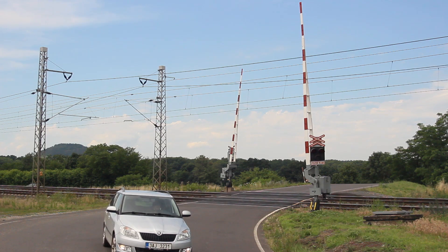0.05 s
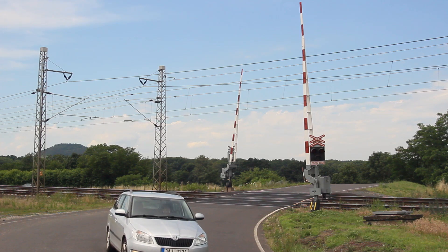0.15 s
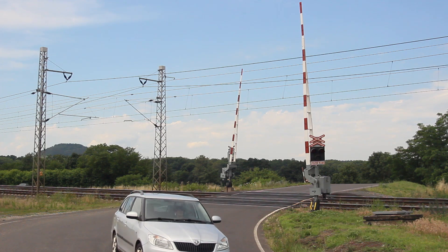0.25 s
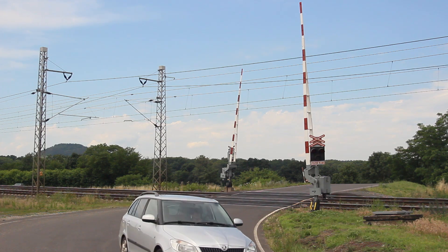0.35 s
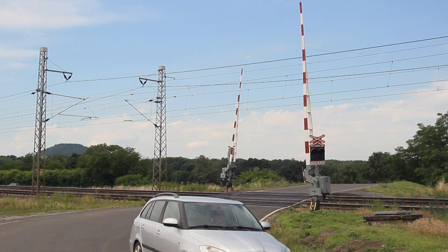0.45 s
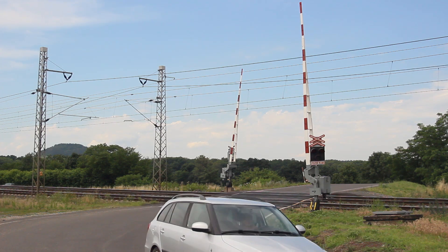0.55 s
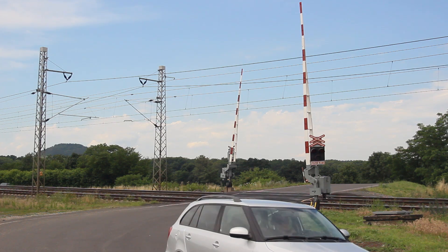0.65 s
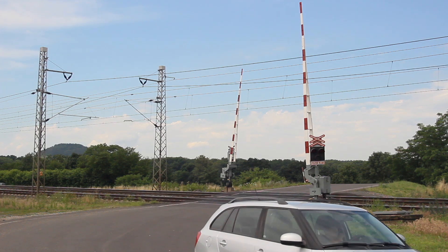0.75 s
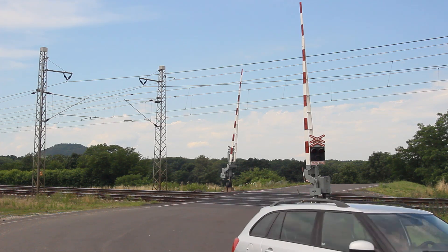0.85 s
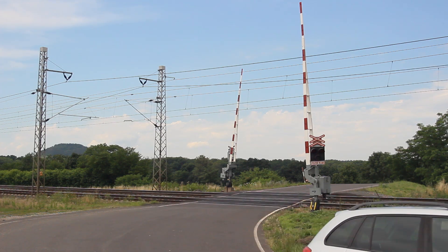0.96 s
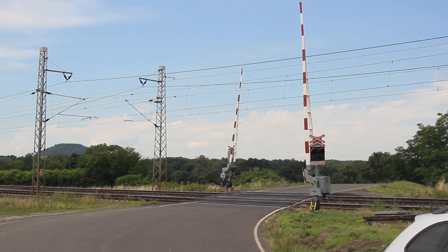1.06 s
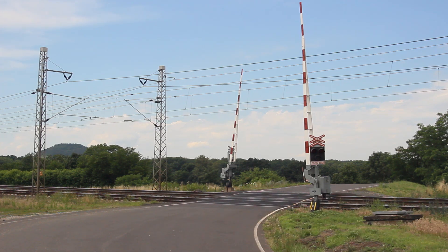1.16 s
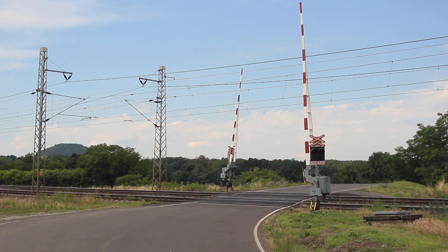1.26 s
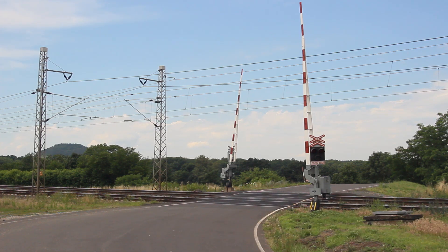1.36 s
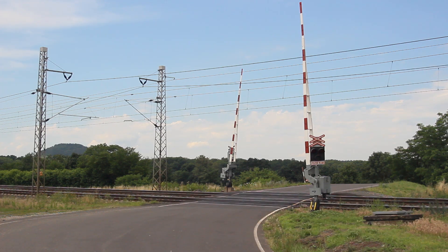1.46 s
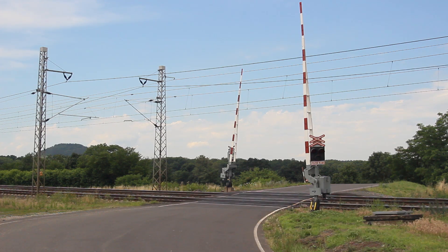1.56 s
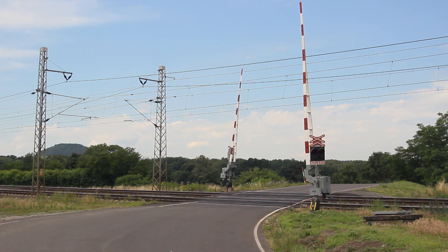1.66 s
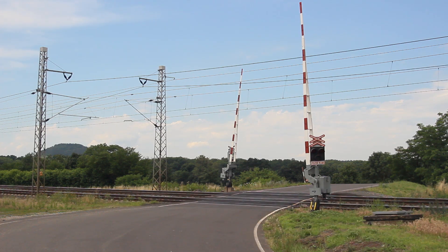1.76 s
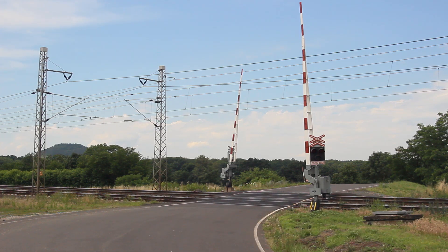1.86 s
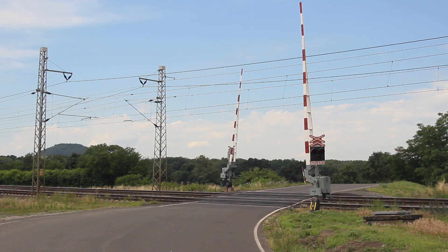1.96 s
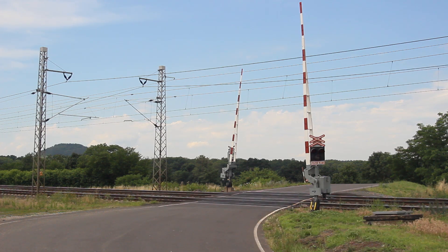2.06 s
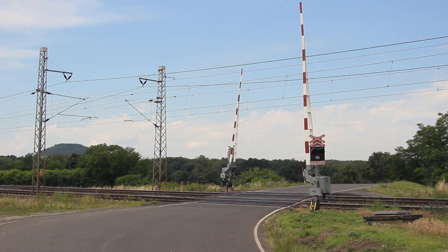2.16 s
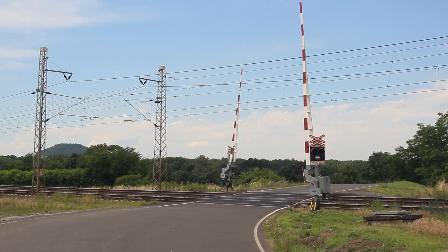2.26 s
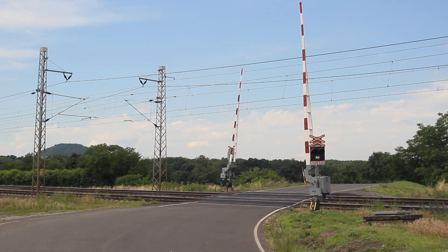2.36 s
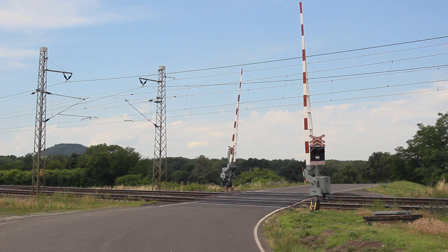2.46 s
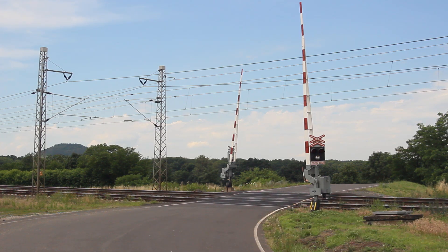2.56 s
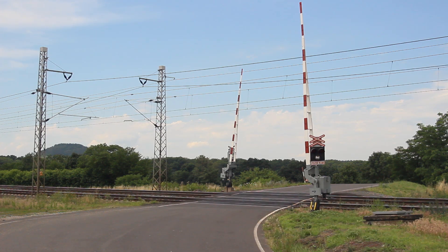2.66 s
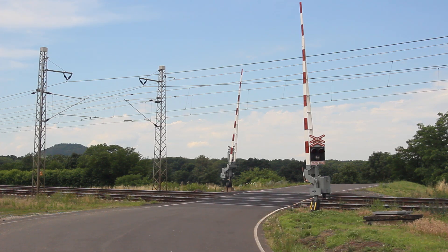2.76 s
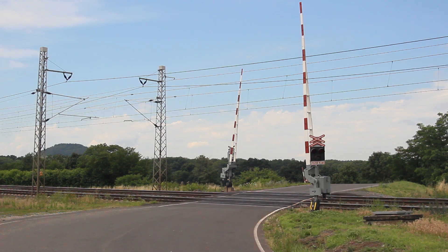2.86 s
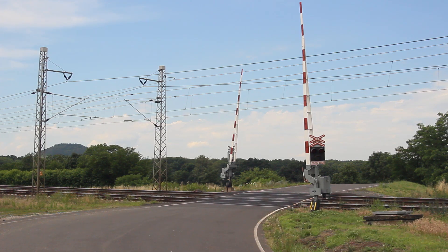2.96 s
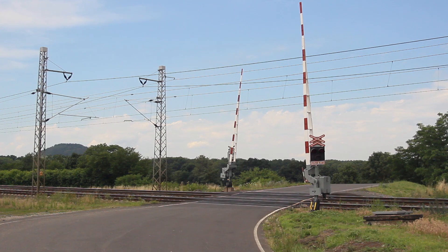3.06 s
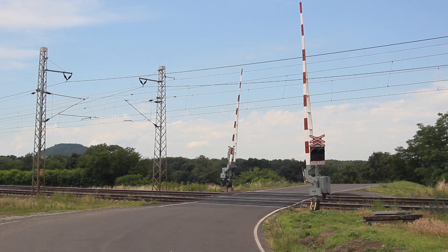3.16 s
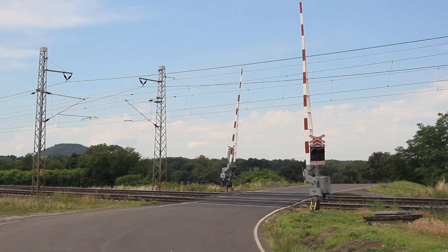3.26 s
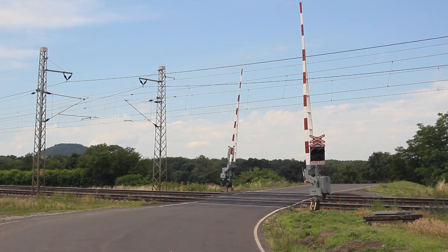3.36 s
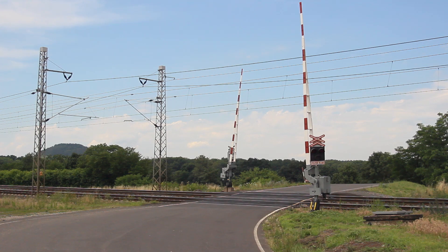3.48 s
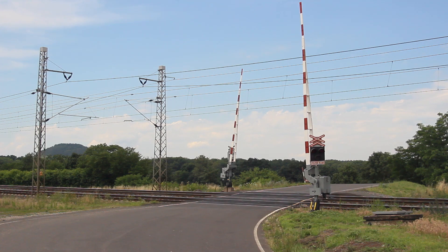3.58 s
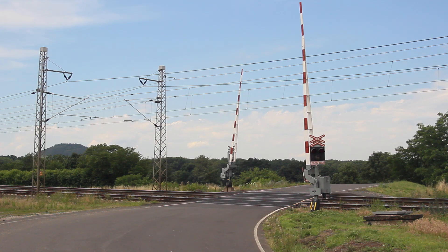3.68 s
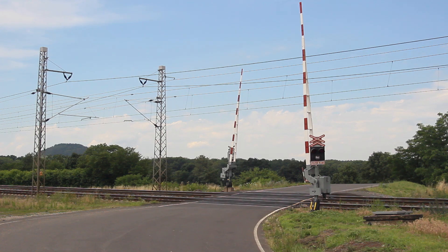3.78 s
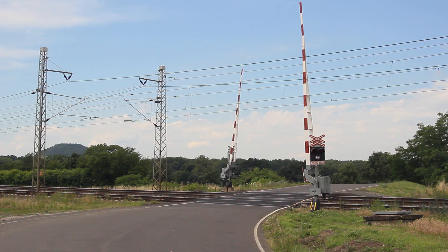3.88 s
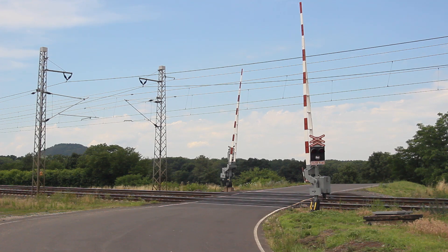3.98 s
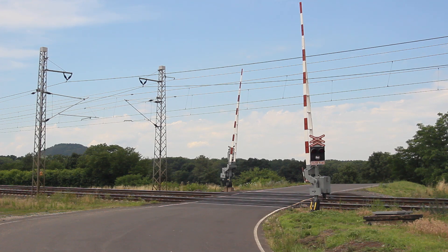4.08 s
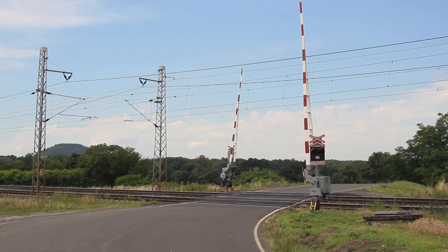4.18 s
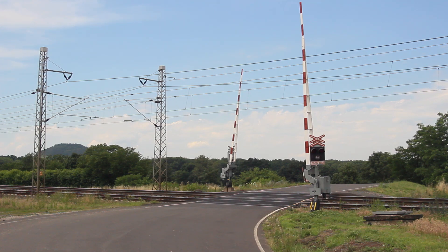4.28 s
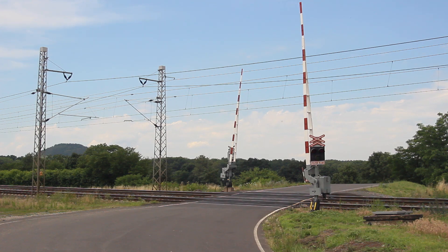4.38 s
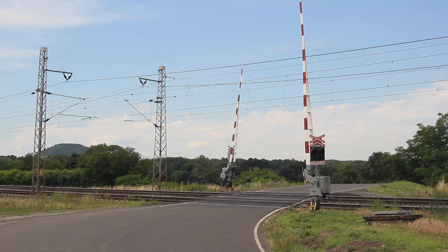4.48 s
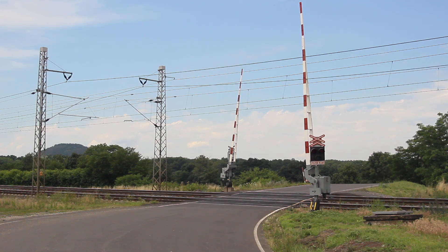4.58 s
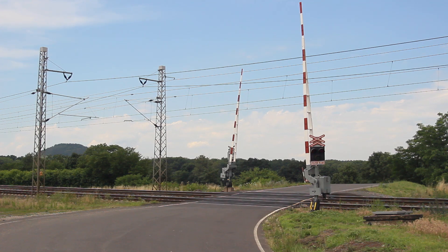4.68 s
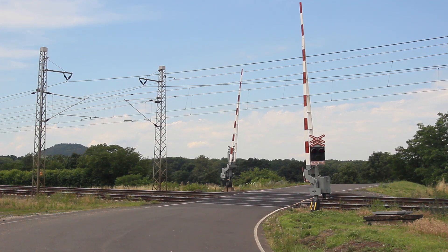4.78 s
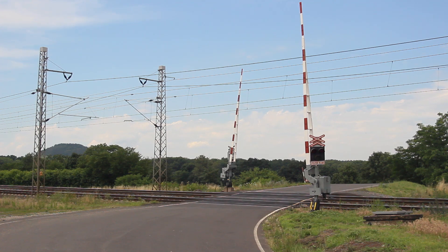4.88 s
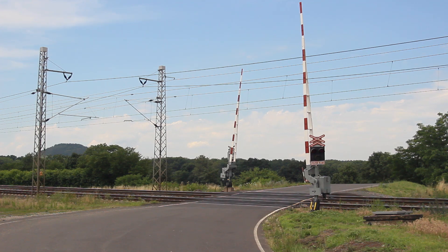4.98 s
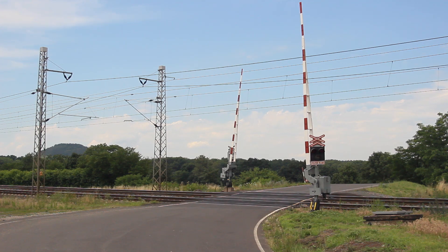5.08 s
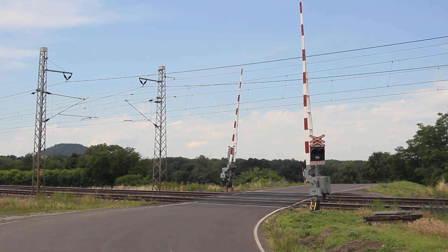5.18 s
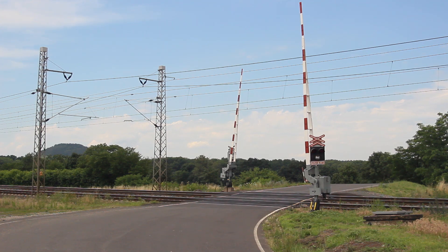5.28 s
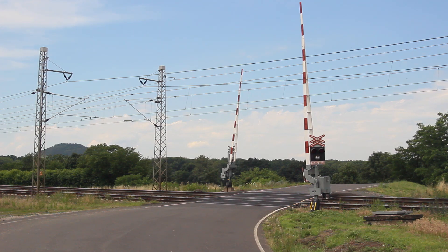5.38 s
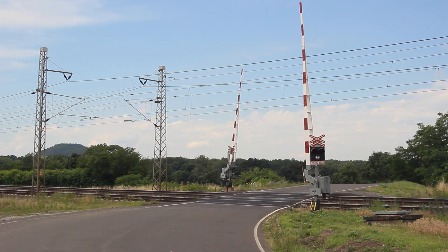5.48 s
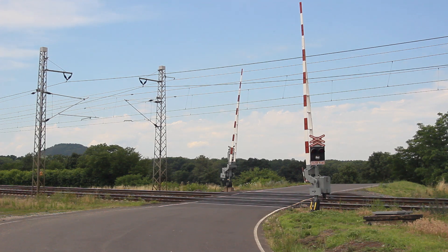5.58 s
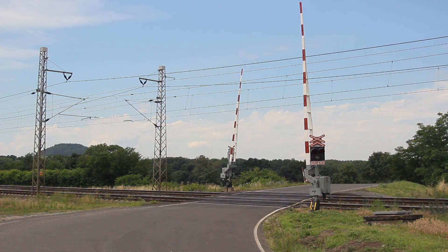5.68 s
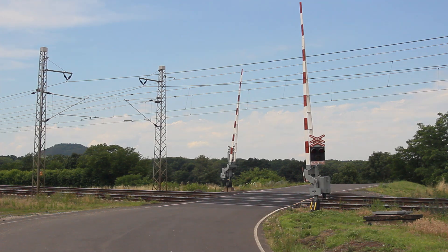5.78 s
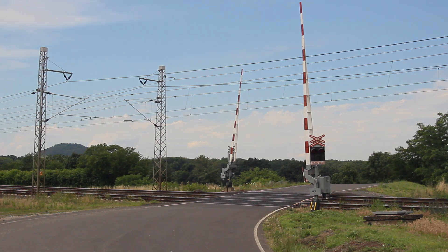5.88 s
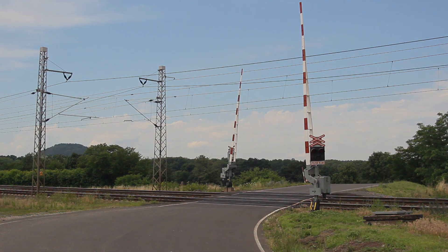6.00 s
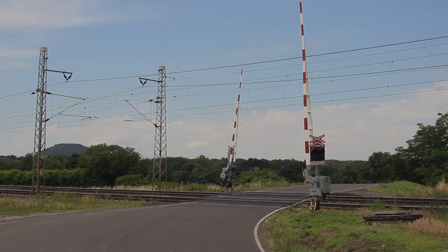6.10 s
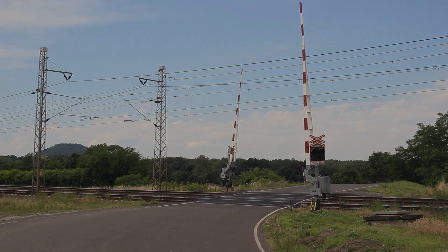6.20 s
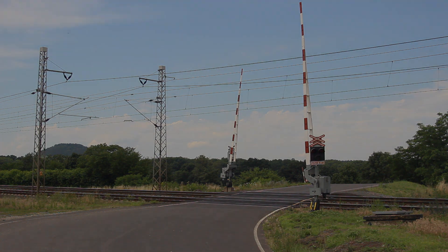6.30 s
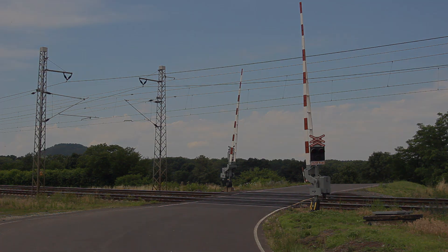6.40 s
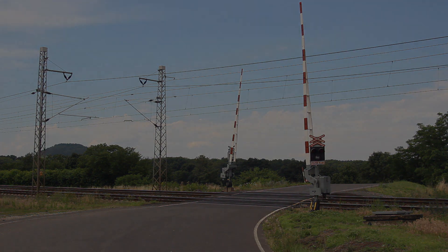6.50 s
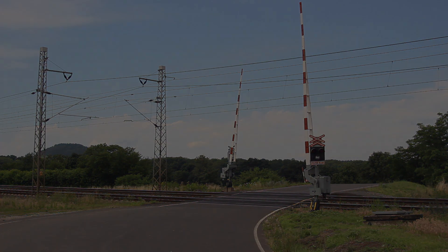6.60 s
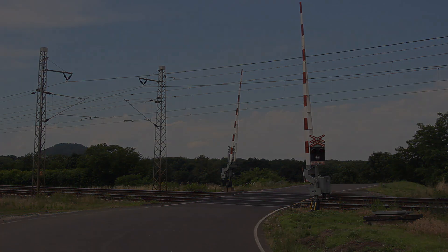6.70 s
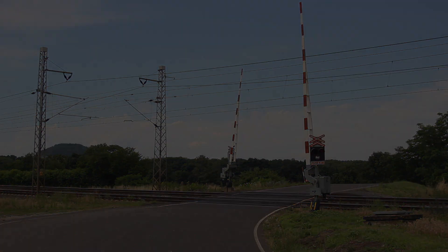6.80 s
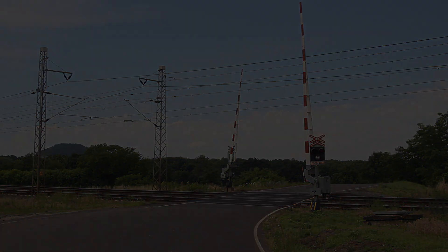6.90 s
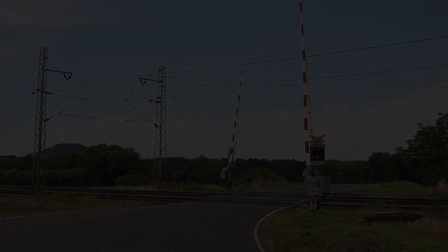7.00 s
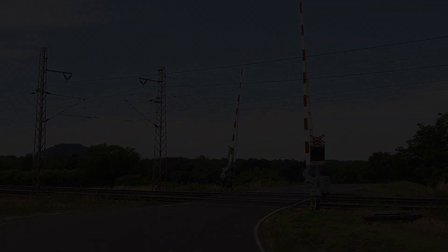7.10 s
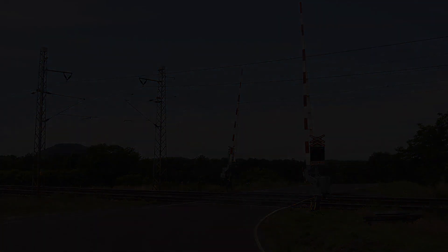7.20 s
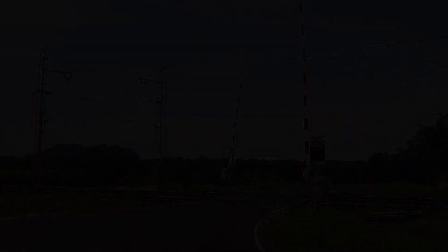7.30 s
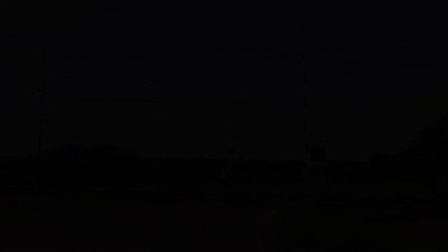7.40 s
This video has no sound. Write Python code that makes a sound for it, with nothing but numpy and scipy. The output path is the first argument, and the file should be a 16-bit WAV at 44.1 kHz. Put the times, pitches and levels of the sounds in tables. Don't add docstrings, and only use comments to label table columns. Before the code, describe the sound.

A small car is close to the roadside microphone from the first instant: steady broad tyre roar, mid-low body rumble and a modest four-cylinder hum. Near 1 s a brighter airy hiss from its front swells briefly, then turns into the sharper hiss of rear tyres and exhaust. A soft, dull tyre thump lands at 1.6 s. From about 2 s the noise falls away while the engine pitch rises under load, eases at 3.4 s, drops for the next gear and pulls on, faint by 4.5 s. Thin lark chips appear from 2.6 s, growing into fast whistles, trills and rasps, clearest at 5 to 5.5 s, then sparser. A very faint, very high cricket scrape and soft air hiss lie beneath throughout. From 6 s everything fades steadily, with a barely audible wind puff at 7 s and last chirps near 7.3 s.

```python
import sys
import numpy as np
from scipy import signal
from scipy.fft import rfft, irfft, next_fast_len
from scipy.io import wavfile
from scipy.ndimage import uniform_filter1d, map_coordinates

SR = 44100
rng = np.random.default_rng(int(sys.argv[2]) if len(sys.argv) > 2 else 0)


def pcm_store(signal):
    levels = np.round(np.clip(np.atleast_2d(signal), -1, 1) * 32767)
    wavfile.write(sys.argv[1], SR, levels.astype(np.int16).T)


def ratio_of_db(decibels):
    return 10 ** (np.asarray(decibels, float) / 20)


N = 328523
TIME_S = np.arange(N) / SR

# frequency [Hz], density [dB per Hz].
AIR_SPECTRUM = [(12, -41), (20, -6.5), (220, 6), (599, -5.5), (1050, -7), (2480, -11), (3560, -11),
                (4210, -12), (4710, -18), (5560, -11.5), (9990, -14.5), (14000, -10.5), (15600, -12)]
# frequency [Hz], density [dB per Hz].
CAPSULE_SPECTRUM = [(12, -37), (20, -5), (770, -9.5), (1240, -12), (1420, -44), (1780, -10.5), (3980, -9),
                    (4710, -8), (5410, -10.5), (15600, -8.5)]

# part of the syllable [0-1], pitch ratio, level [dB].
FALL_SHAPE = [(0, .97, -12), (.15, 1.0, -1), (.4, .94, 0), (.55, .86, -6), (.9, .7, -10), (1, .68, -25)]
RISE_SHAPE = [(0, .84, -1), (.2, 1.1, -1.5), (.4, 1.09, 6.5), (.55, 1.17, -6), (.75, 1.08, -4),
              (1, 0.73, -18)]
HOOK_SHAPE = [(0, 1.01, -2), (.3, .97, 0), (.62, .985, -1), (.82, 1.15, -2), (1, 1.03, -4)]
ARCH_SHAPE = [(0, .86, -7), (.15, .98, -0.5), (.5, 1.02, -5.5), (.75, .99, 2.5), (.9, .88, 3),
              (1, 0.71, -20)]
BUZZ_SHAPE = [(0, .965, -13), (.4, 1.0, 0), (.7, 1.05, -6), (1, .975, -8)]
WARBLE_SHAPE = [(0, 1.04, -1), (.5, .96, -2), (.8, 1.0, -5), (1, 1.04, -4)]
# start [s], end [s], start pitch [Hz], end pitch [Hz], level [dB].
FALLS = [
    (5.9, 5.94, 3900, 3500, -44),
]
EASY_FALLS = [
    (4.594, 4.616, 2900, 2900, -49),
    (4.628, 4.65, 2950, 2900, -48),
    (4.662, 4.684, 2950, 2900, -49),
    (4.696, 4.718, 2900, 2900, -50),
    (5.174, 5.235, 3400, 3170, -39),
    (6.78, 6.83, 2920, 2900, -49),
]
SLOW_FALLS = [
    (4.107, 4.207, 4100, 4500, -43.5),
    (4.208, 4.378, 4370, 4480, -39),
]
RISES = [
    (3.382, 3.41, 3800, 3780, -47),
    (5.255, 5.269, 3540, 3600, -35.5),
    (5.371, 5.381, 4280, 4300, -37),
    (5.381, 5.41, 4800, 5130, -33.5),
    (5.411, 5.5, 5170, 5160, -32.5),
    (5.381, 5.5, 4330, 4530, -40),
    (5.545, 5.56, 5299, 5330, -45),
]
EASY_RISES = [
    (4.977, 5.035, 3650, 4320, -39),
    (5.107, 5.16, 3640, 3800, -38.5),
]
QUICK_RISES = [
    (4.843, 4.925, 3880, 3490, -49),
]
HOOKS = [
    (3.74, 3.965, 5250, 4470, -47.5),
]
ARCHES = [
    (4.395, 4.47, 3450, 3620, -49),
    (5.965, 6.04, 3380, 3620, -43.5),
    (6.15, 6.217, 3477, 3580, -42),
]
SLOW_ARCHES = [
    (6.955, 7.018, 3640, 5150, -44),
    (7.019, 7.155, 5340, 5450, -43.5),
]
BUZZES = [
    (3.54, 3.6, 4960, 4950, -49),
    (5.27, 5.335, 5400, 5513, -44),
    (5.275, 5.33, 4800, 4930, -45),
]
BURRS = [
    (4.22, 4.29, 3480, 3590, -50),
    (5.34, 5.365, 3469, 3520, -43),
    (5.39, 5.49, 4480, 4430, -38.5),
    (5.7, 5.8, 2830, 2580, -45),
]
WARBLES = [
    (5.022, 5.063, 4350, 3870, -32),
    (5.066, 5.092, 4180, 4000, -37),
    (5.15, 5.205, 4120, 3730, -30.5),
    (5.206, 5.235, 3920, 3770, -36),
    (5.268, 5.312, 3840, 3370, -30),
    (5.315, 5.343, 3480, 3440, -40),
]
SLOW_WARBLES = [
    (5.697, 5.825, 3390, 3060, -40.5),
]

# start [s], pitch [Hz], level [dB].
UP_CHIPS = [(2.81, 4150, -43), (3.3, 5600, -48), (3.325, 5700, -44), (4.499, 3900, -44.5),
            (5.001, 5400, -50), (5.024, 5600, -50), (2.583, 5240, -41), (3.633, 4730, -49),
            (3.663, 5200, -47), (5.052, 5600, -49), (5.094, 4700, -45), (5.237, 3920, -50),
            (5.48, 3560, -49), (5.562, 3980, -49), (5.594, 2460, -43), (6.077, 4620, -41.5),
            (6.175, 5536, -49), (6.261, 5642, -51), (7.208, 5400, -47), (7.267, 5200, -44)]
DOWN_CHIPS = [(4.57, 3300, -51), (4.096, 3600, -53), (3.6, 4100, -48), (3.608, 3800, -49),
              (3.619, 3800, -55), (3.641, 4150, -51), (3.65, 4250, -53), (3.66, 3930, -49),
              (3.681, 3900, -50), (5.622, 4500, -49), (5.665, 5300, -51), (3.445, 3400, -57),
              (3.409, 5000, -45), (3.418, 4670, -47), (3.425, 4200, -43), (3.432, 3910, -45),
              (3.483, 4820, -45), (3.497, 4720, -43), (3.512, 4400, -44), (5.407, 3080, -48),
              (5.42, 2910, -44), (5.434, 2680, -56), (5.521, 2840, -46), (6.108, 4000, -48.5),
              (6.318, 3370, -43.5), (6.494, 2600, -48), (6.757, 2500, -49), (6.854, 2800, -51),
              (6.892, 2500, -49), (7.283, 4800, -52)]
PEEPS = [(3.8, 3350, -51), (3.542, 3350, -54), (3.527, 3930, -43), (4.7, 5140, -55), (5.516, 6000, -43),
         (5.518, 5000, -40), (5.548, 4630, -45), (5.689, 4470, -46), (6.338, 2550, -51), (6.033, 2500, -50),
         (6.057, 2500, -51), (5.932, 2800, -49), (6.086, 3700, -47), (6.775, 3900, -48), (6.875, 2900, -50)]
# start [s], length [s], top pitch [Hz], drop at both ends [0-1], level [dB].
ARCS = [
    (3.666, .026, 5800, 0.07, -49),
    (5.107, .022, 4830, .055, -48),
    (5.492, 0.041, 3960, 0.04, -44),
    (6.261, 0.038, 4927, 0.09, -44.5),
    (6.835, 0.019, 3860, 0.26, -47),
    (7.291, 0.024, 5526, .24, -43),
    (7.316, .026, 4420, .2, -43),
    (7.343, .031, 3485, 0.17, -49),
    (7.347, 0.033, 4580, 0.1, -45),
]
# start [s], length [s], start pitch [Hz], end pitch [Hz], level [dB].
GLIDES = [(2.591, 0.055, 5530, 3880, -44), (2.845, .045, 3770, 3770, -52), (2.885, 0.13, 3780, 3850, -46),
          (4.519, 0.013, 5300, 5000, -47), (5.247, 0.0063, 3200, 4900, -42),
          (4.849, 0.027, 5030, 4700, -45), (3.458, 0.022, 5450, 4820, -38.5),
          (2.637, 0.047, 5100, 4500, -52), (3.538, 0.062, 5360, 5470, -46.5), (4.59, .03, 5040, 4840, -56),
          (4.613, .04, 3550, 3960, -51), (5.325, 0.077, 4970, 3870, -50), (5.53, .008, 2972, 4800, -38),
          (5.536, .019, 3700, 2900, -45), (5.59, 0.03, 3140, 3370, -54), (5.612, .027, 2005, 2060, -45.5),
          (5.638, 0.0183, 3760, 5100, -44), (5.735, 0.046, 5200, 3950, -48.5),
          (6.322, .011, 3400, 2100, -50), (6.345, .04, 3400, 4700, -55), (5.697, .012, 4300, 3500, -48.5),
          (5.826, .021, 3100, 2500, -48.5), (6.095, 0.017, 3900, 4700, -41),
          (6.356, 0.04, 3360, 3930, -47.5), (7.146, .024, 5130, 4330, -44)]
# start [s], length [s], top pitch [Hz], plunge [0-1], level [dB].
PLUNGES = [
    (4.472, .02, 5450, 0.14, -45),
    (2.821, .045, 5000, .08, -44),
    (3.745, .072, 3980, 0.22, -48),
    (4.957, .026, 4150, .38, -43),
    (4.513, .04, 5080, .11, -41),
    (6.194, 0.02, 5850, 0.26, -44),
    (6.278, .024, 5750, .42, -47),
    (7.237, .013, 5460, .4, -42),
]
# start [s], length [s], top pitch [Hz], plunge [0-1], level [dB].
SWOOPS = [
    (6.398, .035, 4620, .3, -40.5),
    (2.668, .03, 4450, .08, -43),
]
# start [s], end [s], pulse rate [per s], last throat resonance [Hz], level [dB].
RASPS = [
    (4.703, 4.927, 328, 4430, -46),
    (6.45, 6.698, 314.5, 4300, -46),
]

# start [s], frequency [Hz], level [dB], time to fall 60 dB [s].
KNOCKS = [
    (1.56, 268, -14, .2),
    (7.02, 60, -37, .3),
    (7.04, 104, -35, 0.28),
]

# time [s], level [dB].
CAR = [
    (0, -16),
    (.02, -18.5),
    (1.0, -19.5),
    (1.8, -20),
    (2.26, -27),
    (3.05, -31.5),
    (3.44, -35.5),
    (4.4, -44.5),
    (7.45, -46.5),
]
# time [s], effort [dB].
EFFORT = [(0, -13), (1.15, -8), (2.05, -4), (2.5, -1), (3.05, 0), (3.22, -1), (3.34, -6), (3.45, -12),
          (3.65, -2), (4.3, -6), (4.8, -40)]
# time [s], speed [turns per s].
CRANK = [
    (0, 39.8),
    (1.1, 42.7),
    (2.0, 44.4),
    (3.25, 48.3),
    (3.36, 48.5),
    (3.55, 40.5),
    (4.4, 41),
]
# multiple of crank speed, level [dB].
UPPER_ORDERS = [(4, -6), (6, -2), (8, -3), (10, 0), (11, -10), (12, 0), (13, -14), (14, 0), (16, -4),
                (18, -7)]
# frequency [Hz], width [Hz], level [dB].
PIPE = [(186.4, 75, -10), (257.4, 20.4, -4.5), (361, 23, -10.5), (479.6, 30, -4.5), (563.5, 52, -6.5),
        (611.4, 37, -2.5), (681, 20, -16)]
# time [s], level [dB], width [s].
BOOMS = [
    (.45, -50, 0.19),
    (1.66, -46.5, 0.2),
]
# frequency [Hz], density [dB per Hz].
RUMBLE = [(53, -49), (90, -20), (119, -17), (178, -8.5), (265, 0), (353, -4), (495, 2), (583, 0.5),
          (794, -3), (900, -2), (1170, -13.5), (1980, -120)]
# frequency [Hz], density [dB per Hz].
ROAR = [(400, -39), (650, -7), (760, -14), (1010, 0.5), (1190, -0.5), (1580, -5), (2080, -10.5),
        (2450, -12), (3000, -18.5), (3900, -15.5), (4600, -32), (8000, -61)]
# frequency [Hz], density [dB per Hz].
NOSE_HISS = [(1100, -61), (1800, -5.5), (2450, 2.5), (3000, 3.5), (3500, -4.5), (3880, -2), (4500, -8),
             (5600, -10), (6800, -15.5), (7700, -12), (10800, -21), (12100, -27.5), (13300, -23),
             (14400, -38), (15600, -54)]
# frequency [Hz], density [dB per Hz].
TAIL_HISS = [(1800, -11.5), (3000, -8.5), (4500, 7), (5600, 5.5), (6900, 2), (7700, -1.5), (9000, -4.5),
             (10200, -6), (11200, -10), (12300, -10.5), (15500, -35)]

NOSE_LAG_MS, TAIL_LAG_MS, LEAST_LAG_MS = .185, .165, .1


def rms_one(x):
    return x / np.sqrt(np.mean(x ** 2) + 1e-20)


def in_time(rows):
    s, *columns = np.transpose(rows)
    return [np.interp(TIME_S, s, column) for column in columns]


def drift(rate_hz):
    pole = np.exp(-80 * np.pi * rate_hz / SR)
    noise = rng.standard_normal(N // 40 + 2002)
    slow = signal.lfilter([1], [1, -2 * pole, pole * pole], noise)[2000:]
    return np.interp(np.arange(N) / 40, np.arange(len(slow)), rms_one(slow))


def coloured(spectrum, flicker_db):
    size = next_fast_len(N)
    hz, db = np.transpose(spectrum)
    bins_hz = np.arange(size // 2 + 1) * SR / size
    shape = ratio_of_db(np.interp(np.log(bins_hz + 1), np.log(hz), db))
    noise = irfft(rfft(rng.standard_normal(size)) * shape, size)[:N]
    return rms_one(noise * ratio_of_db(flicker_db * drift(13.6)))


def background(spectrum, level_db, duck):
    car_db, = in_time(CAR)
    excess_db = car_db - car_db.min()
    return ratio_of_db(level_db - duck * excess_db) * coloured(spectrum, flicker_db=.15)


def cricket():
    strokes_per_s, first_s, wing_hz = 88.155, .0082, 13900
    strokes = (TIME_S - first_s + 1) * strokes_per_s
    phase, size_db = rng.uniform(0, 7, 900), rng.normal(0, 3.2, 900)
    k = strokes.astype(int)
    burst = ratio_of_db(size_db[k]) * np.exp(-((strokes % 1 - .25) / .07) ** 2)
    return ratio_of_db(-59) * rms_one(burst * np.sin(2 * np.pi * wing_hz * TIME_S + phase[k]))


def add_tone(out, start_s, hz, gain, edge_s):
    t = np.arange(len(hz)) / SR
    ends = np.clip(np.minimum(t, t[-1] - t) / edge_s, 0, 1)
    i = round(start_s * SR)
    out[i:i + len(hz)] += np.sqrt(2) * gain * ends * np.sin(2 * np.pi * np.cumsum(hz) / SR)


def whistle_notes():
    up_chip, down_chip, peep = (0.0114, 0.934, 1.15), (0.01, 1.126, 0.95), (0.0105, 0.93, 0.87)
    for chips, (length, first, last) in ((UP_CHIPS, up_chip), (DOWN_CHIPS, down_chip), (PEEPS, peep)):
        for s, hz, db in chips:
            yield s, length, first * hz, hz, last * hz, db
    for s, length, hz, drop, db in ARCS:
        yield s, length, hz * (1 - drop), hz, hz * (1 - drop), db
    for s, length, start_hz, end_hz, db in GLIDES:
        mid_hz = start_hz + .6 * (end_hz - start_hz)
        yield s, length, start_hz, mid_hz, end_hz, db


def whistles():
    out = np.zeros(N)
    for s, length, start_hz, mid_hz, end_hz, db in whistle_notes():
        u = np.linspace(-1, 1, round(length * SR))
        bend_hz = (start_hz + end_hz) / 2 - mid_hz
        hz = mid_hz + u * (end_hz - start_hz) / 2 + u ** 2 * bend_hz
        add_tone(out, s, hz, ratio_of_db(db + 4.0 - 1.8 * u ** 2), edge_s=0.0018)
    return out


def trills():
    kinds = [   # phrases, syllable, syllables per s, roughness
        (FALLS, FALL_SHAPE, 118.0, .006), (EASY_FALLS, FALL_SHAPE, 89.0, .006),
        (SLOW_FALLS, FALL_SHAPE, 48.5, .006), (RISES, RISE_SHAPE, 100.0, .015),
        (EASY_RISES, RISE_SHAPE, 86.5, .015), (HOOKS, HOOK_SHAPE, 51.5, .005),
        (ARCHES, ARCH_SHAPE, 67.8, .006), (SLOW_ARCHES, ARCH_SHAPE, 50.0, .006),
        (WARBLES, WARBLE_SHAPE, 78.0, .012), (SLOW_WARBLES, WARBLE_SHAPE, 62.3, .012),
        (BUZZES, BUZZ_SHAPE, 248.0, .008), (QUICK_RISES, RISE_SHAPE, 119.0, .01),
        (BURRS, BUZZ_SHAPE, 100.0, .018)]
    out = np.zeros(N)
    waver, uneven_db = drift(300), drift(50)
    for phrases, shape, per_s, rough in kinds:
        part, ratio, part_db = np.transpose(shape)
        for start, end, start_hz, end_hz, db in phrases:
            t = np.arange(round((end - start) * SR)) / SR
            here = round(start * SR) + np.arange(len(t))
            swell = np.sin(np.pi * (t / t[-1]) ** 0.53)
            carrier_hz = start_hz + (end_hz - start_hz) * t / t[-1]
            carrier_hz = carrier_hz * (1 + rough * waver[here])
            cycle = t * per_s % 1
            hz = uniform_filter1d(carrier_hz * np.interp(cycle, part, ratio), size=25)
            level_db = db + 1.3 * swell + uneven_db[here] + np.interp(cycle, part, part_db)
            add_tone(out, start, hz, uniform_filter1d(ratio_of_db(level_db), size=25), edge_s=0.0028)
    return out


def rasps():
    throat_from_hz, throat_width_hz = 5350, 300
    out, wobble = np.zeros(N), .006 * drift(30) + .014 * drift(300)
    for start, end, per_s, last_hz, db in RASPS:
        part = np.linspace(0, 1, round((end - start) * SR))
        pulse_hz = per_s * (1 + wobble[round(start * SR):][:len(part)])
        throat_hz = last_hz + (throat_from_hz - last_hz) * (1 - part) ** 2.2
        for k in range(11, 20):
            near_db = -8 * ((k * per_s - throat_hz) / throat_width_hz) ** 2
            gain = ratio_of_db(db + 3 + near_db - 7 * (1 - part) ** 8)
            add_tone(out, start, k * pulse_hz, gain, edge_s=.004)
    return out


def plunges():
    out, top_part = np.zeros(N), .55
    for notes, start_ratio in ((PLUNGES, 0.94), (SWOOPS, .8)):
        for s, length, top_hz, drop, db in notes:
            part = np.linspace(0, 1, round(length * SR))
            rise = np.clip(1 - part / top_part, 0, 1)
            fall = np.clip((part - top_part) / (1 - top_part), 0, 1)
            hz = top_hz * (1 - (1 - start_ratio) * rise ** 2 - drop * fall ** 1.5)
            add_tone(out, s, hz, ratio_of_db(db + 2 - 2.6 * fall), edge_s=0.0014)
    return out


def larks():
    song = whistles() + trills() + rasps() + plunges()
    song = song * ratio_of_db(.7 * drift(45))
    size = round(.06 * SR)
    scatter = rng.standard_normal(size) * ratio_of_db(np.linspace(0, -25, size))
    return song + ratio_of_db(-10) * signal.fftconvolve(song, scatter / np.linalg.norm(scatter))[:N]


def knocks():
    out = np.zeros(N)
    for s, hz, db, t60 in KNOCKS:
        since = np.maximum(TIME_S - s, 0)
        swell = 1 - np.exp(-since * hz / 2.3)
        out += ratio_of_db(db - 60 * since / t60) * swell * np.sin(2 * np.pi * hz * since)
    return out


def engine_levels():
    loaded_db = in_time(CAR)[0] + in_time(EFFORT)[0]
    booms = sum(ratio_of_db(db) * np.exp(-((TIME_S - s) / width) ** 2) for s, db, width in BOOMS)
    firing = ratio_of_db(loaded_db - 28) + booms
    return firing, loaded_db - 4


def engine():
    turns, = in_time(CRANK)
    firing, upper_db = engine_levels()
    angle = 2 * np.pi * np.cumsum(turns) / SR
    muffling = np.clip((TIME_S - 3.2) * 5, 0, 1)
    upper = 0
    for k, db in UPPER_ORDERS:
        pipe = sum(ratio_of_db(peak_db) / (1 + (2 * (k * turns - hz) / width_hz) ** 2)
                   for hz, width_hz, peak_db in PIPE)
        muffled_db = 2.0 * max(k - 6, 0) * muffling
        gain = ratio_of_db(db + 1.7 * drift(2.6) - muffled_db) * pipe
        upper = upper + gain * np.sin(k * angle + rng.uniform(0, 7.1))
    firing_note = firing * ratio_of_db(1.2 * drift(3.0)) * np.sin(2 * angle)
    return np.sqrt(2) * (firing_note + ratio_of_db(upper_db) * upper)


def off_asphalt(x, lag_ms, bounce, size=1):
    arrival = np.arange(N) - lag_ms * SR / 1000
    late = map_coordinates(uniform_filter1d(x, size), [arrival], order=3, mode="nearest")
    return (x + bounce * late) / np.sqrt(1 + bounce ** 2)


def echo_lags():
    nose_ms = np.maximum(NOSE_LAG_MS - .024 * TIME_S ** 3, LEAST_LAG_MS)
    away = np.maximum(TIME_S - 1.5, 0) / .7
    return nose_ms, LEAST_LAG_MS + (TAIL_LAG_MS - LEAST_LAG_MS) / (1 + away ** 2)


def car_levels():
    nose_hidden_s, tail_shows_s, swing_s = 1.396, 1.03, 0.073
    aimed_s, aimed_width_s = 0.98, 0.14
    (car_db,), (effort_db,) = in_time(CAR), in_time(EFFORT)
    rumble_db = car_db + .5 - 6.5 * np.clip((TIME_S - 0.69) / 2.9, 0, 1)
    aimed_db = 4 * np.exp(-((TIME_S - aimed_s) / aimed_width_s) ** 2)
    facing_db = -30 + 5.5 * np.minimum(TIME_S, aimed_s) + aimed_db
    nose = ratio_of_db(facing_db) / (1 + np.exp((TIME_S - nose_hidden_s) / swing_s))
    nose = nose + ratio_of_db(car_db - 21)
    shown = 1 / (1 + np.exp((tail_shows_s - TIME_S) / swing_s)) + ratio_of_db(-20)
    tail = shown * ratio_of_db(car_db - 8 + 0.26 * np.maximum(effort_db, -6.5))
    return rumble_db, car_db, nose, tail


def car_noise():
    rumble_db, roar_db, nose, tail = car_levels()
    nose_ms, tail_ms = echo_lags()
    front = nose * off_asphalt(coloured(NOSE_HISS, flicker_db=.6), nose_ms, bounce=.55)
    tail_bounce = .7 * ((tail_ms - LEAST_LAG_MS) / (TAIL_LAG_MS - LEAST_LAG_MS)) ** .6
    rear = tail * off_asphalt(coloured(TAIL_HISS, flicker_db=.6), tail_ms, tail_bounce, size=3)
    opened_db = np.interp(TIME_S, (1.6, 2.3), (-7, 5.5))
    top = signal.sosfiltfilt(signal.butter(2, 7500, "high", fs=SR, output="sos"), rear)
    rear = rear + (ratio_of_db(opened_db) - 1) * top
    floorless = signal.butter(2, 95, "high", fs=SR, output="sos")
    rumble = ratio_of_db(rumble_db) * signal.sosfilt(floorless, coloured(RUMBLE, flicker_db=1.08))
    roar = ratio_of_db(roar_db + 0.5) * coloured(ROAR, flicker_db=1.07)
    return rumble + roar + front + rear


def scene():
    centre = background(AIR_SPECTRUM, -45.5, duck=0.03) + cricket() + larks()
    centre = centre + knocks() + engine() + car_noise()
    side = background(CAPSULE_SPECTRUM, -55, duck=0.24)
    return np.array([centre + side, centre - side])


def roll_off(x):
    return signal.sosfilt(signal.butter(12, 15750, fs=SR, output="sos"), x)


def record(dry):
    fade_from_s, silent_at_s = 5.95, 7.995
    fade = np.clip((silent_at_s - TIME_S) / (silent_at_s - fade_from_s), 0, 1)
    return roll_off(dry * fade)


dry = scene()
out = record(dry)
pcm_store(out)
```